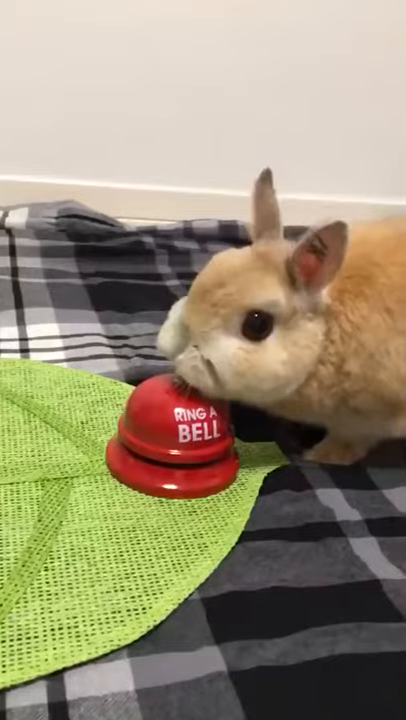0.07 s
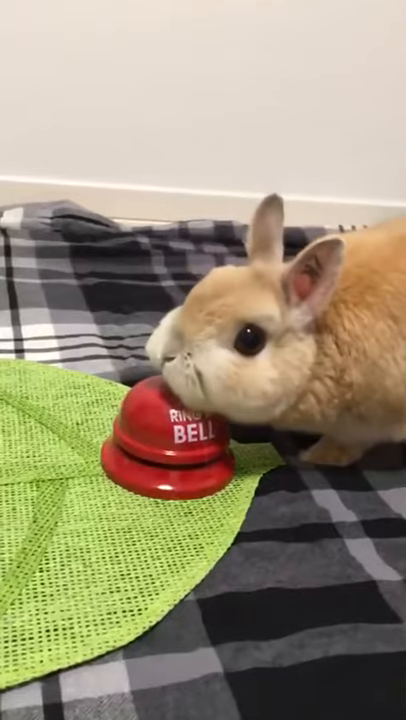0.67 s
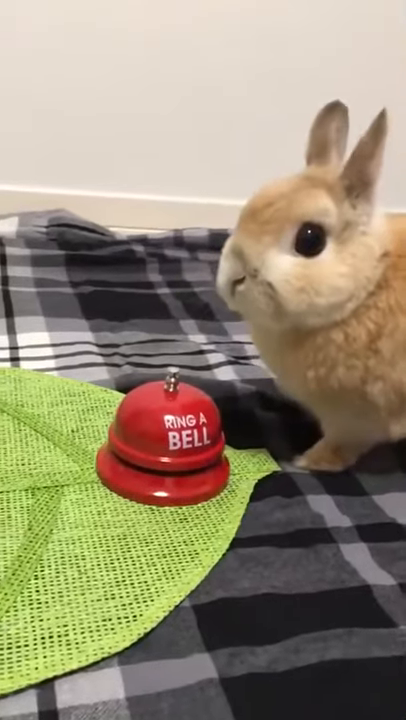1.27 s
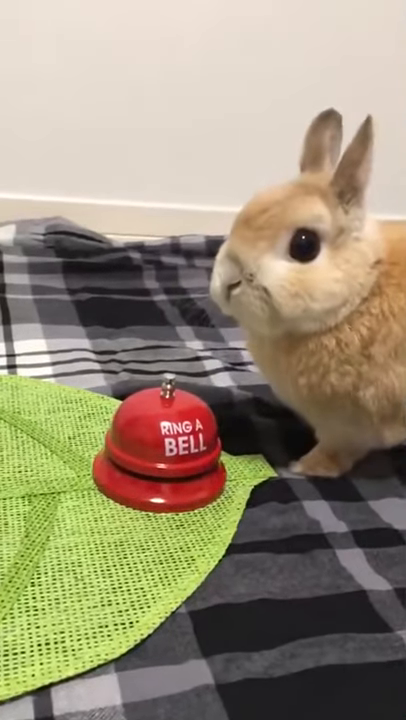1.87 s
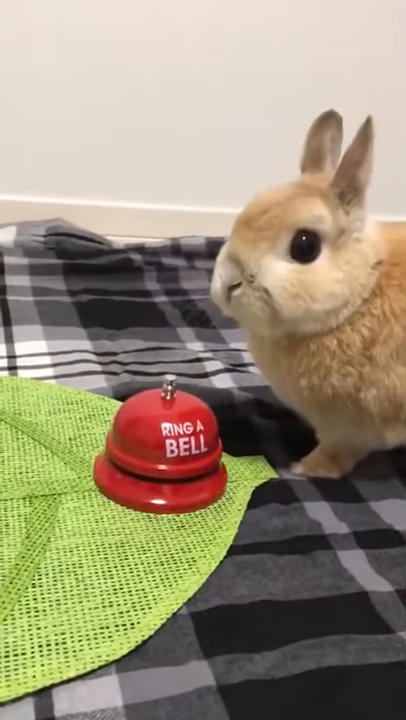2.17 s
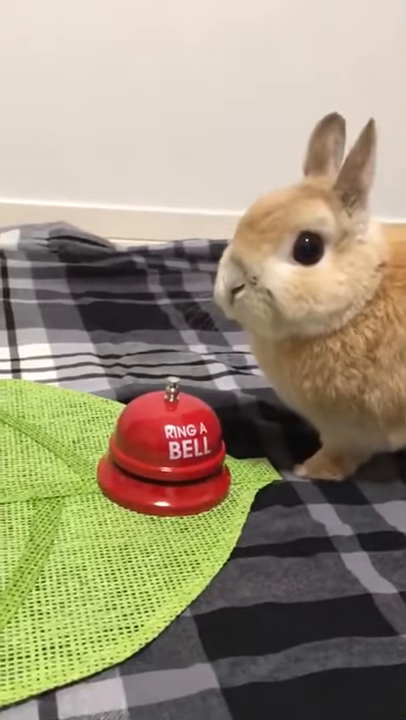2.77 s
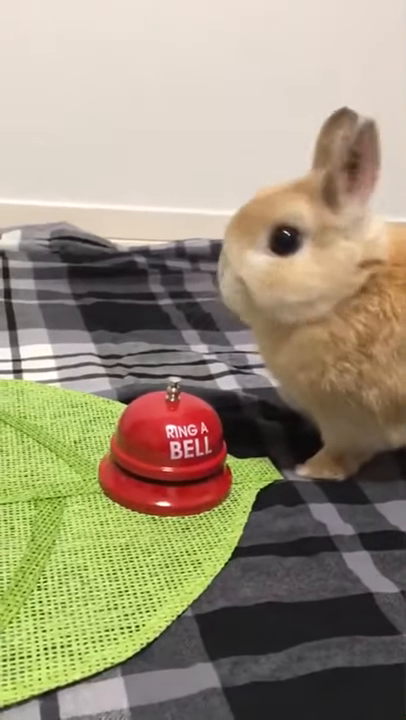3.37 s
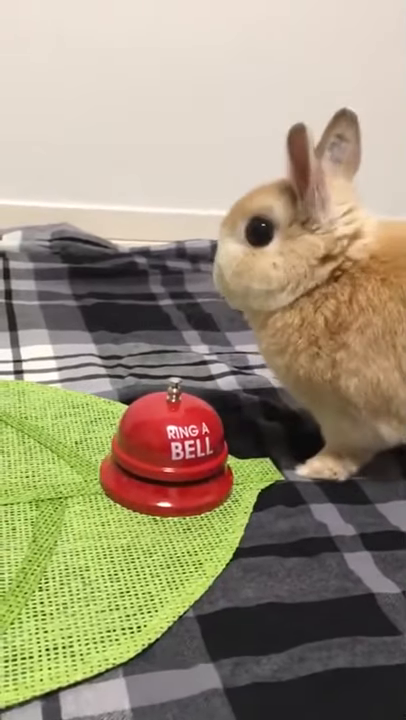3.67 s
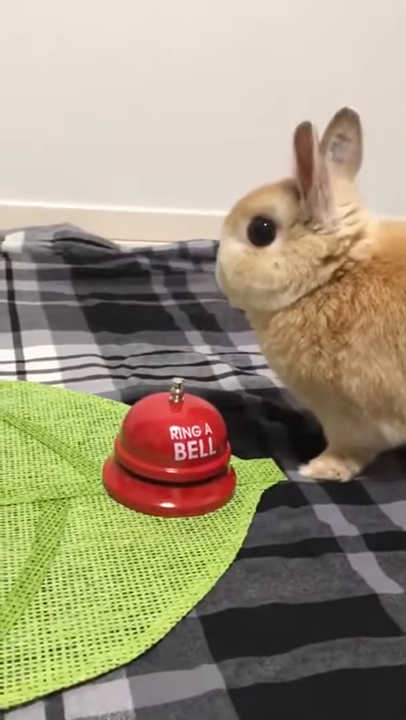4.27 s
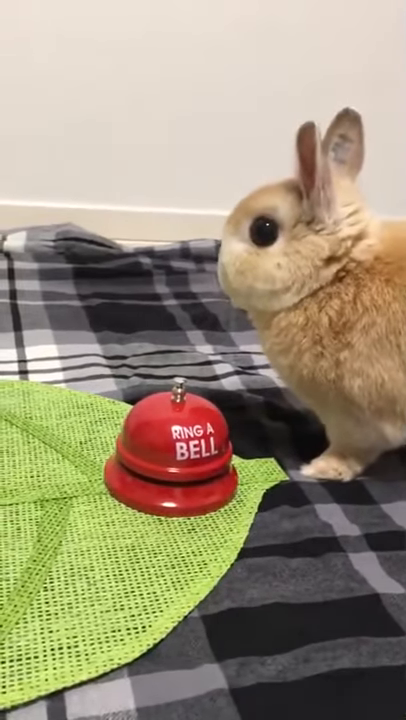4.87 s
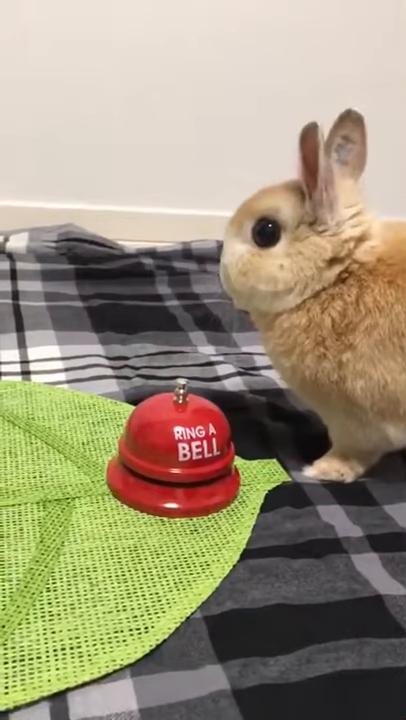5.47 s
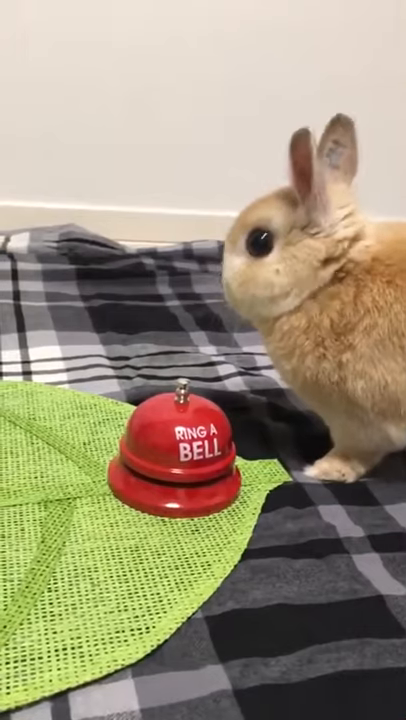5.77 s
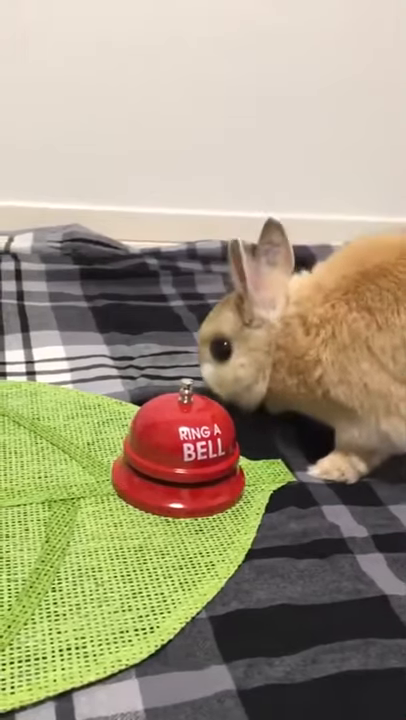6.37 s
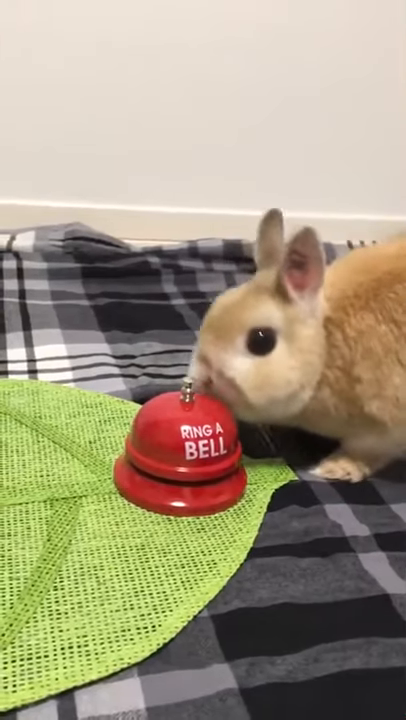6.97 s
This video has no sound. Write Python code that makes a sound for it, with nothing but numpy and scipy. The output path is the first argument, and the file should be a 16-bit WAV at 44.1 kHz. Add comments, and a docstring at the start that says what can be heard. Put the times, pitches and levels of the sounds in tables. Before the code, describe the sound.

In a quiet room with a faint motor hum and hiss, a rabbit presses a nearby counter bell. One clear, high ding rings out, its shimmer fading quickly while a lower tone lingers. The plunger springs back with a light metallic clack. As the ring dies, a barely audible car speeds up and goes by outside, low and muffled, with a few tiny rustles of a blanket close by.

```python
"""A counter bell rings once, pressed by a rabbit's chin, on a blanket in a quiet room.
The clapper cracks against the steel dome, whose paired modes beat as they die away.
As the head lifts, the plunger ticks and clacks back up; the base and the rabbit scuff the blanket.
Outside, a faint car pulls away and passes, its engine booming through the wall over a wash of tyres.
Under it all lie a low room drone, a household motor's hum and a soft hiss."""
import sys
import numpy as np
from scipy import signal
from scipy.fft import rfft, irfft
from scipy.io import wavfile

SR = 44100
rng = np.random.default_rng(int(sys.argv[2]) if len(sys.argv) > 2 else 0)


def materialize(psi):
    """Save the field psi as 16-bit PCM at rate SR to the path in sys.argv[1].

    A 1-D psi becomes a single channel; in a 2-D psi each row is a channel.
    """
    bounded = np.clip(np.atleast_2d(psi).T, -1, 1)
    quanta = np.round(bounded * 32767).astype(np.int16)
    wavfile.write(sys.argv[1], SR, quanta)


N = 309582
TIME = np.arange(N) / SR

# The ring: the dome's modes, each with a close twin. The trough of the beat is timed from the strike.
# pitch_hz, level_db, t60_s, split_hz, twin_relative_db, first_trough_s
DOME_MODES = [(1050.2, -56.5, 5.3, .5, -30, .5), (1085.6, -38.2, 5.66, .5, -35, .5),
              (3059.5, -42, 2.0, 6.9, -5.5, .035), (5955, -17.7, .8, -3.6, -14, .26),
              (9145, -23, .31, 4, -25, .2), (12046, -42, .18, 16, -9, .055),
              (13275, -48, .14, 25, -10, .03), (14152, -34, .11, 12, -18, .05),
              (15167, -46, .12, 10, -18, .05)]


def dome(strike_s=.3896, rise_s=.00028, twin_life=.88):
    """The dome is not quite round, so each mode beats against a twin that dies a little sooner."""
    t, ring = np.maximum(TIME - strike_s, 0), np.zeros(N)
    for hz, db, t60, split_hz, twin_db, trough_s in DOME_MODES:
        phase = 2 * np.pi * hz * t
        twin_phase = phase + 2 * np.pi * split_hz * (t - trough_s)
        twin = from_db(twin_db) * dying(t, twin_life * t60) * np.sin(twin_phase)
        ring += from_db(db) * (dying(t, t60) * np.sin(phase) - twin)
    return ring * (1 - np.exp(-t / rise_s)) * head_gain()


def head_gain(down_db=2.5, up_db=-.04, dip_db=-1.8, dip_s=.56, dip_width_s=.1):
    """The head above the dome throws the ring forward until it lifts; the level also dips briefly."""
    lifted = ramp(start_s=1.14, length_s=.11)
    dip = np.exp(-((TIME - dip_s) / dip_width_s) ** 2)
    return from_db(down_db + (up_db - down_db) * lifted + dip_db * dip)


# The bright colour of steel hitting steel: frequency_hz, level_db
CRACK_SPECTRUM = [(150, -37.5), (550, -12), (1400, -2.5), (2400, -12), (3200, -5.5), (4200, -2),
                  (5000, -9.5), (6200, 7), (7400, -5.5), (9000, 2), (10400, -14), (14000, -9.5),
                  (15800, -22.5)]
# Light touches as the clapper swings up, the main hit and a softer one after: start_s, level_db
CLAPPER_BLOWS = [(.356, -40), (0.367, -38), (.372, -35.5), (0.3843, -23), (0.389, 0), (0.393, -10.5)]


def clapper(crack_db=-23, crack_t60=.008, shiver_db=-9, shiver_t60=.06):
    """Steel on steel: a sharp crack, then a brief shiver of the whole housing."""
    out, t = np.zeros(N), TIME[:SR // 4]
    envelope = dying(t, crack_t60) + from_db(shiver_db) * dying(t, shiver_t60)
    for start_s, db in CLAPPER_BLOWS:
        add(out, start_s, from_db(crack_db + db) * envelope * noise(CRACK_SPECTRUM, len(t)))
    return room(out, wet_db=-5.5)


# The short metallic ring of the plunger and its lever: pitch_hz, level_db, t60_s
PLUNGER_MODES = [(1377, -10, .06), (1750, -13, .06), (3800, -1, .035), (4150, -3, .02), (5000, -28, .05),
                 (6330, -14, 0.054), (6450, -11.5, 0.032), (7790, -9, .06), (8620, 0, .035),
                 (8900, 6.5, 0.017), (9230, -2, 0.036), (10200, -11, .03), (10930, -7, 0.028),
                 (11500, -8, 0.027)]
# The plunger ticks in its sleeve and clacks home: start_s, level_db, attack_s
PLUNGER_CLACKS = [(1.1618, -18.5, .001), (1.2342, -7, 0.0024), (1.2385, -17, 0.0024), (1.2424, 0, 0.00029),
                  (1.3238, -20.5, 0.00091)]


def plunger(ring_db=-42, tick_db=-43, tick_t60=.019):
    """Each contact is a tick that rings the small steel parts; sliding contacts start softly."""
    out, t = np.zeros(N), TIME[:SR // 4]
    for start_s, db, attack_s in PLUNGER_CLACKS:
        ring = sum(from_db(mode_db) * dying(t, t60) * np.sin(2 * np.pi * (hz * t + rng.random()))
                   for hz, mode_db, t60 in PLUNGER_MODES)
        tick = dying(t, tick_t60) * noise(CRACK_SPECTRUM, len(t))
        attack = 1 - np.exp(-t / attack_s)
        add(out, start_s, from_db(db) * attack * (from_db(ring_db) * ring + from_db(tick_db) * tick))
    return room(out, wet_db=-8)


# Soft scuffs and bumps on the blanket: start_s, level_db, centre_hz, t60_s
BLANKET_SCUFFS = [(.253, -67.5, 4100, 0.018), (.358, -59, 1450, 0.037), (0.371, -52.5, 1430, 0.03),
                  (0.713, -69, 3760, 0.033), (.7195, -57, 2700, 0.015), (0.75, -48, 2070, 0.0081),
                  (0.751, -51.5, 535, 0.019), (1.2387, -40.5, 1550, .011), (1.243, -53, 850, 0.043),
                  (3.432, -56, 326, 0.049), (4.633, -59, 450, 0.043), (5.944, -69, 2800, 0.05),
                  (6.046, -70, 2196, .06)]


def scuffs(half_width_octaves=.6):
    """The bell's base rocks and the rabbit shifts, each move a short, dull burst of band noise."""
    out, t, hz = np.zeros(N), TIME[:SR // 4], np.geomspace(20, 20000, 60)
    for start_s, db, centre_hz, t60 in BLANKET_SCUFFS:
        band_db = -20 * np.log10(1 + (np.log2(hz / centre_hz) / half_width_octaves) ** 4)
        rustle = noise(np.column_stack([hz, band_db]), len(t))
        add(out, start_s, from_db(db) * dying(t, t60) * rustle)
    return room(out, wet_db=-10)


# The dark roar of tyres on the road: frequency_hz, level_db
TYRE_SPECTRUM = [(20, 2.5), (55, 4.5), (120, 2.5), (250, -1.5), (450, -15.5), (650, -16.5), (950, -13.5),
                 (1350, -16), (2000, -19), (3000, -28), (5000, -35), (9000, -43)]


def car(top_speed_m_per_s=7.5, closest_s=4.8, distance_m=10, tyres_db=-61, whine_db=-19, whine_focus=3.7):
    """Over the engine, tyre roar grows with speed and nearness; once past, the car is partly hidden."""
    drone, firing_phase = engine()
    pace = ramp(start_s=2.03, length_s=1.4)
    road_m = top_speed_m_per_s * np.cumsum(pace) / SR
    nearness = distance_m / np.hypot(distance_m, road_m - np.interp(closest_s, TIME, road_m))
    whine = from_db(whine_db) * nearness ** whine_focus * engine_whine(firing_phase)
    roar = noise(TYRE_SPECTRUM, N) + whine
    hidden_db = -8 * ramp(start_s=5.04, length_s=.86)
    return from_db(hidden_db) * (drone + from_db(tyres_db) * pace * nearness * roar)


# The engine revs up, then eases off: time_s, firing_hz
ENGINE_REVS = [(2.3, 32.97), (2.42, 34.1), (2.8, 46.32), (3.93, 70.3), (5.24, 65.4), (5.47, 58.56),
               (5.95, 58.4), (6.2, 56.0)]
# Room resonances that boom as an engine order sweeps through: centre_hz, width_hz, boost_db
ROOM_BOOMS = [(53.3, 2.8, 4), (67.4, 5.6, 3.5), (106.7, 8, 4), (128, 13, 12), (199.4, 22, 17)]


def engine(wall_db_per_octave=-12, flutter_db=2):
    """The lowest orders come muffled through the wall and boom; returns drone and firing phase."""
    firing_hz = np.interp(TIME, *np.transpose(ENGINE_REVS)) * (1 + .002 * drift(rate_hz=5))
    phase, drone = 2 * np.pi * np.cumsum(firing_hz) / SR, np.zeros(N)
    for order in (1, 2, 3):
        boom_db = sum(db / (1 + (2 * (order * firing_hz - centre_hz) / width_hz) ** 2)
                      for centre_hz, width_hz, db in ROOM_BOOMS)
        order_db = wall_db_per_octave * np.log2(order) + boom_db + flutter_db * drift(rate_hz=4.1)
        drone += from_db(order_db) * np.sin(order * phase)
    return np.sqrt(2) * throttle_gain() * drone, phase


def throttle_gain(peak_db=-53, ease_s=3.19, eased_db=-7, build_db_per_s=7, fade_db_per_s=2.3):
    """The drone builds under full throttle, drops as the driver eases off, then fades with distance."""
    since_ease_s = TIME - ease_s
    swell_db = np.minimum(build_db_per_s * since_ease_s, -fade_db_per_s * since_ease_s)
    drop_db = eased_db * ramp(ease_s, length_s=.048)
    return ramp(start_s=2.27, length_s=.33) * from_db(peak_db + swell_db + drop_db)


def engine_whine(firing_phase, db_per_octave=-5.5):
    """Thin high orders, each fading in and out as the car moves through the street's reflections."""
    orders = np.arange(11, 33)
    gains = from_db(db_per_octave * np.log2(orders / orders[0]))
    return sum(gain * drift(rate_hz=1.9) * np.sin(k * firing_phase) for k, gain in zip(orders, gains))


# The motor's hum, one value per harmonic from the fundamental up: level_db
MOTOR_HARMONICS = [-69, -73.5, -73, -73.5, -75.5, -84]
# The room's low drone: frequency_hz, level_db
DRONE_SPECTRUM = [(12, -51.5), (20, -9), (32, -15.5), (59, 0), (75, -2.5), (97, -7), (168, -2), (201, -7.5),
                  (243, -2), (328, -14.5), (441, -17.5), (483, -23.5), (700, -26.5), (910, -60),
                  (1540, -120)]
# The soft hiss on top: frequency_hz, level_db
HISS_SPECTRUM = [(400, -11.5), (650, -10), (900, 6.5), (1400, -3.5), (2500, -8.5), (3700, -9),
                 (5000, -13.5), (6500, -9), (9500, -10), (10400, -17.5), (12000, -15.5), (15500, -21.5),
                 (16000, -47)]


def room_tone(motor_hz=59, wobble_rad=.5, drone_db=-60, hiss_db=-73):
    """A household motor hums and wavers somewhere, amid the room's low drone and an even hiss."""
    phase = 2 * np.pi * motor_hz * TIME
    motor = sum(from_db(db) * np.sin(k * phase + wobble_rad * drift(rate_hz=1.4))
                for k, db in enumerate(MOTOR_HARMONICS, 1))
    drone = from_db(drone_db) * noise(DRONE_SPECTRUM, N)
    return motor + drone + from_db(hiss_db) * noise(HISS_SPECTRUM, N)


# The room's short, dark tail: frequency_hz, t60_s
ROOM_DECAY = [(200, 0.29), (1500, 0.15), (5000, 0.11), (9000, 0.087), (15000, .13)]


def room(x, wet_db, predelay_s=.003, density=.1):
    """Adds a short tail of sparse reflections whose treble dies first."""
    taps = rng.choice([-1., 1.], SR // 2) * (rng.random(SR // 2) < density)
    taps[:round(predelay_s * SR)] = 0
    hz, t, bands = signal.stft(taps, SR, nperseg=256)
    t60 = on_log_axis(ROOM_DECAY, hz)[:, None]
    _, tail = signal.istft(bands * dying(t, t60), SR, nperseg=256)
    return x + from_db(wet_db) * signal.fftconvolve(x, tail / np.linalg.norm(tail))[:N]


def from_db(db):
    """Decibels to gain."""
    return 10 ** (np.asarray(db) / 20)


def dying(t, t60):
    """Free decay, 60 dB down after t60 seconds."""
    return np.exp(-np.log(1000) * t / t60)


def ramp(start_s, length_s):
    """Rises evenly from 0 to 1 and stays there."""
    return np.clip((TIME - start_s) / length_s, 0, 1)


def add(mix, start_s, sound):
    """Mixes a sound in at start_s."""
    part = mix[round(start_s * SR):][:len(sound)]
    part += sound[:len(part)]


def unit(x):
    """Scales to rms 1."""
    return x / np.sqrt(np.mean(x ** 2) + 1e-30)


def on_log_axis(points, hz):
    """Reads a curve of (frequency_hz, value) points at the given frequencies."""
    point_hz, value = np.transpose(points)
    return np.interp(np.log(hz + 1), np.log(point_hz + 1), value)


def noise(spectrum, size):
    """Noise of rms 1, coloured by the given spectrum."""
    gain = from_db(on_log_axis(spectrum, np.fft.rfftfreq(size, 1 / SR)))
    return unit(irfft(rfft(rng.standard_normal(size)) * gain, size))


def drift(rate_hz):
    """Slow random wandering of rms 1."""
    hz = np.fft.rfftfreq(N, 1 / SR)
    return unit(irfft(rfft(rng.standard_normal(N)) / (1 + (hz / rate_hz) ** 4), N))


def scene():
    """The bell close by, the car far off, in mono."""
    return (dome() + clapper() + plunger() + scuffs() + car() + room_tone())[None]


def record(dry):
    """The microphone opens after a moment; a steep low-pass trims the very top."""
    opened = ramp(start_s=.12, length_s=.02)
    lowpass = signal.firwin(511, cutoff=15800, window=("kaiser", 9), fs=SR)
    return signal.oaconvolve(dry * opened, lowpass[None], "same")


dry = scene()
out = record(dry)
materialize(out)
```